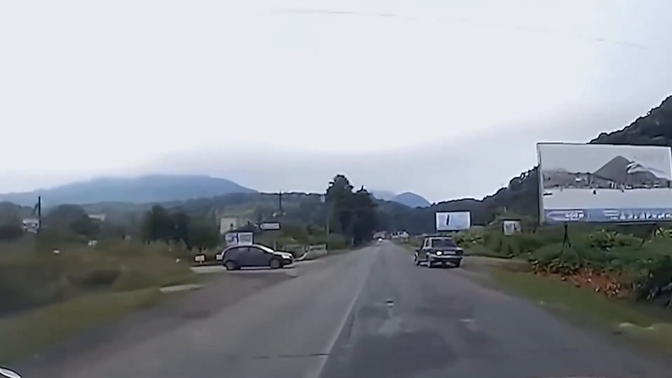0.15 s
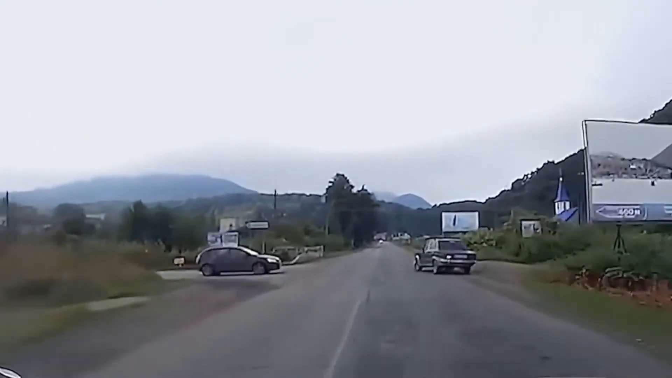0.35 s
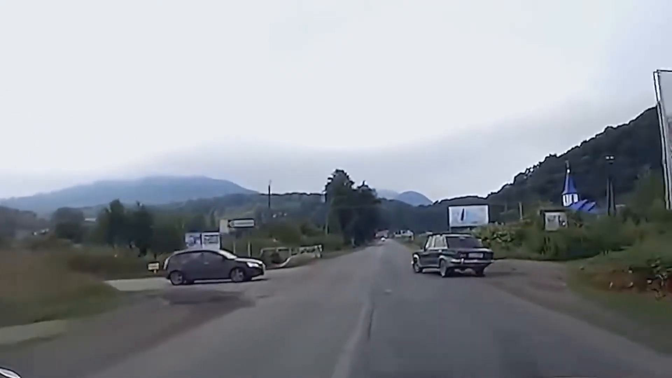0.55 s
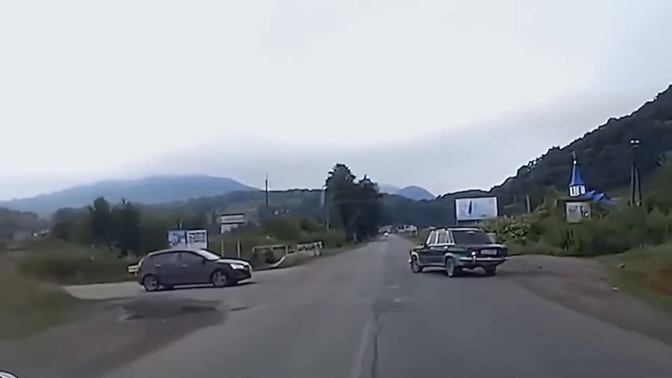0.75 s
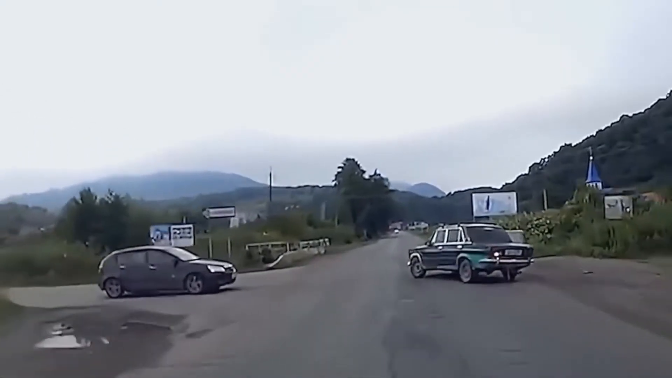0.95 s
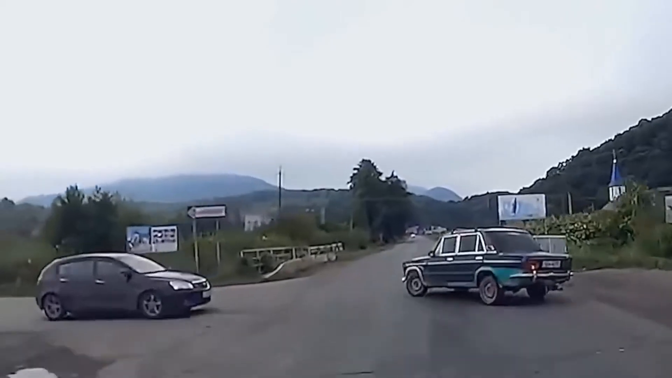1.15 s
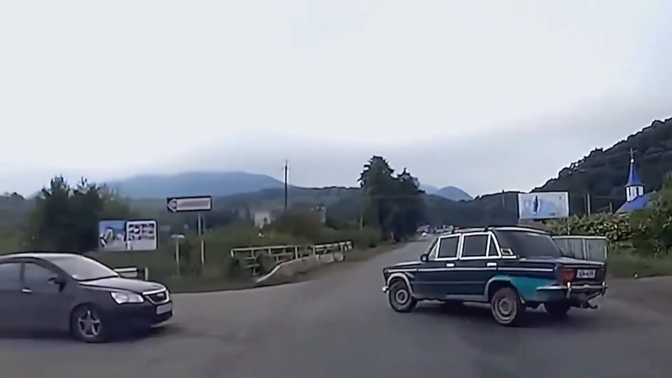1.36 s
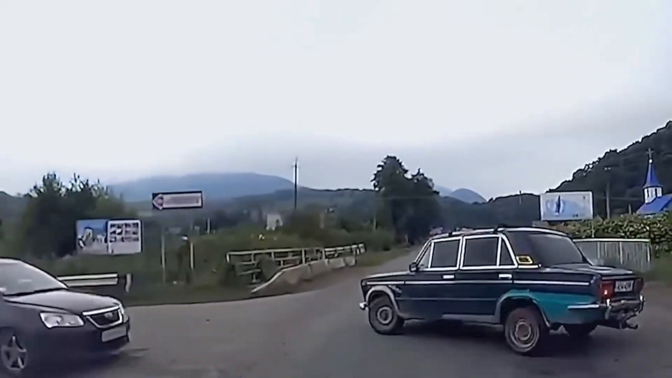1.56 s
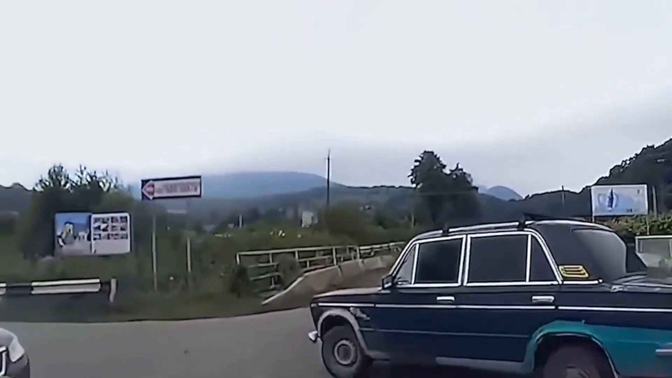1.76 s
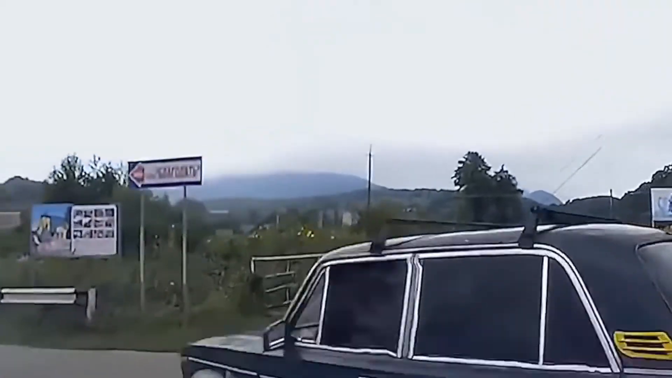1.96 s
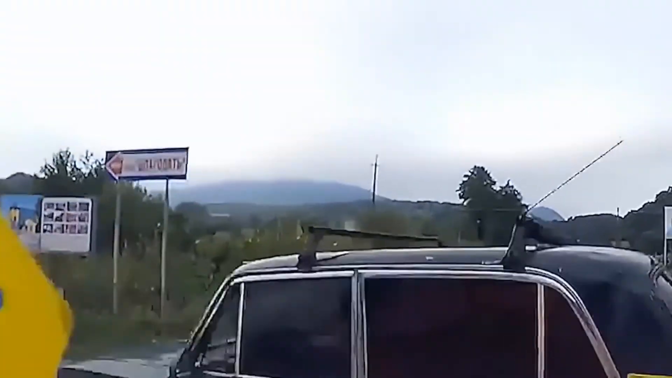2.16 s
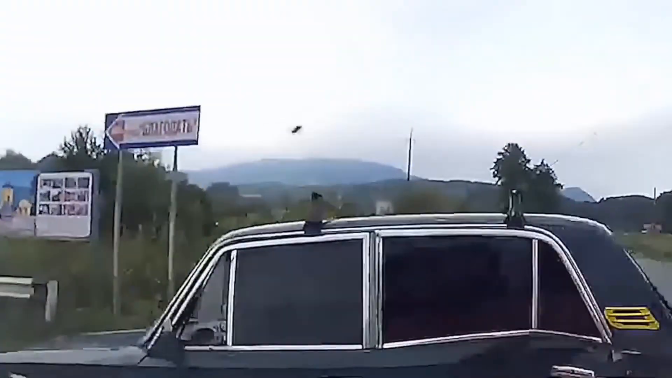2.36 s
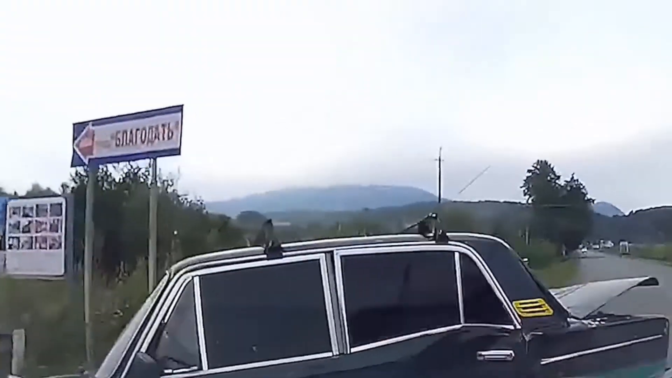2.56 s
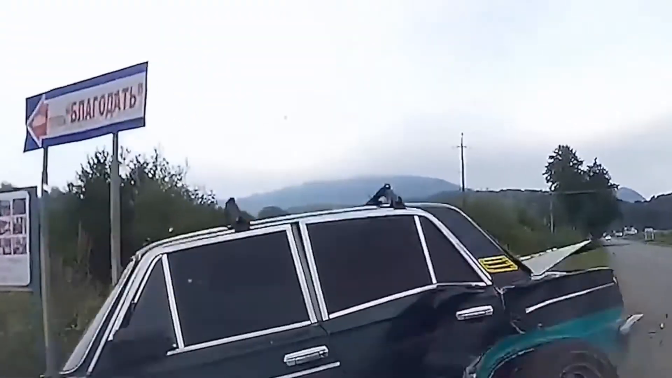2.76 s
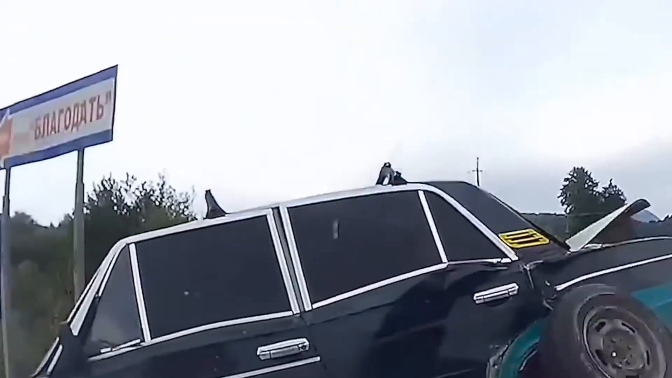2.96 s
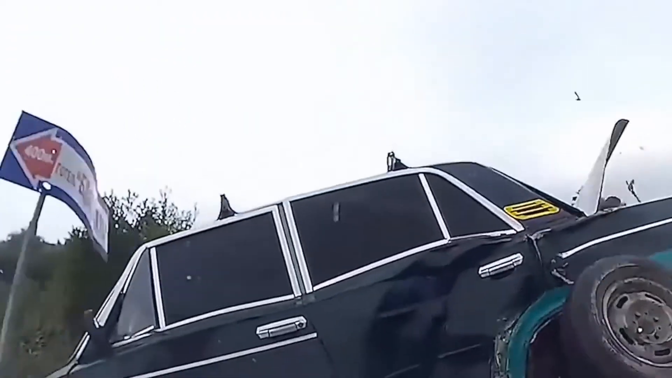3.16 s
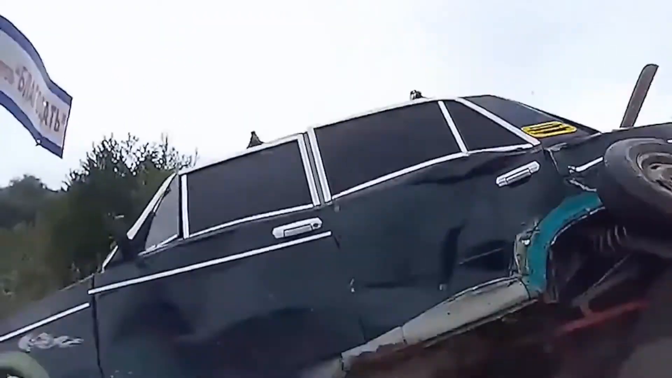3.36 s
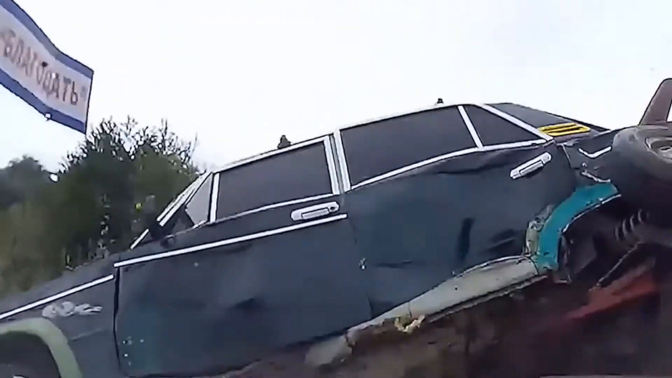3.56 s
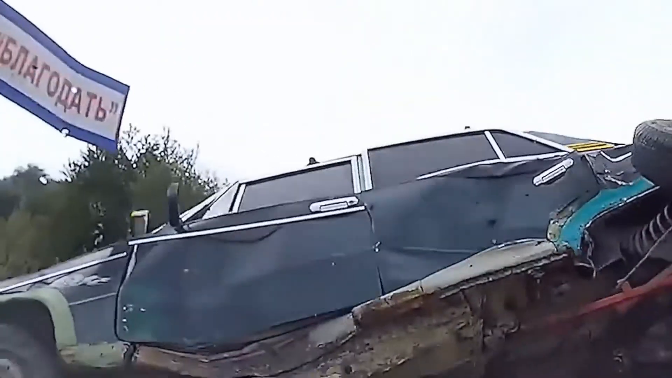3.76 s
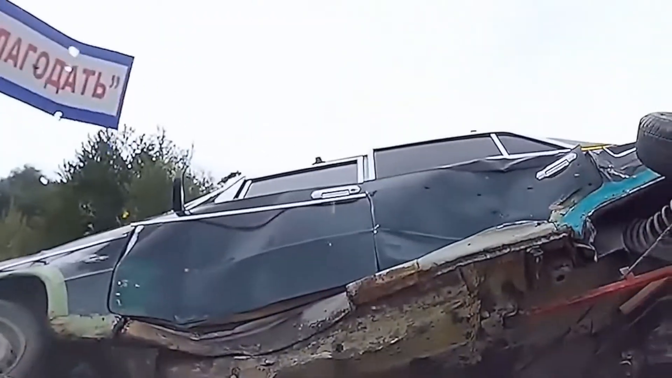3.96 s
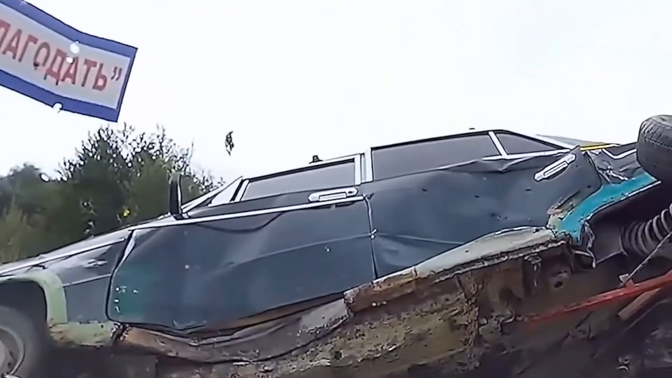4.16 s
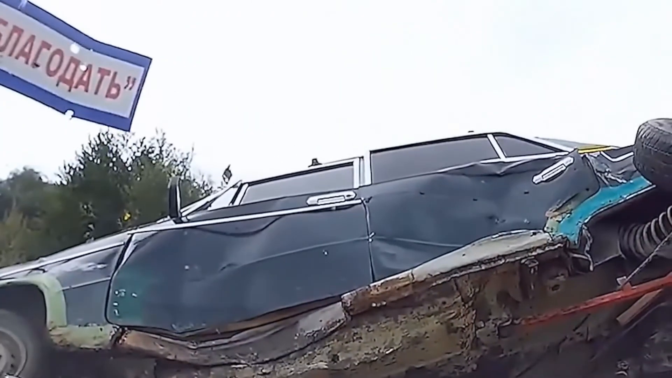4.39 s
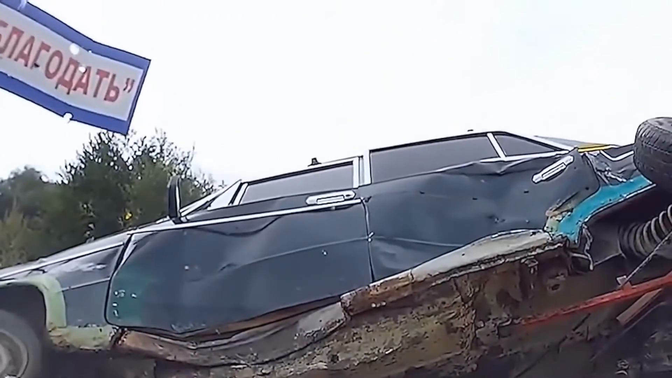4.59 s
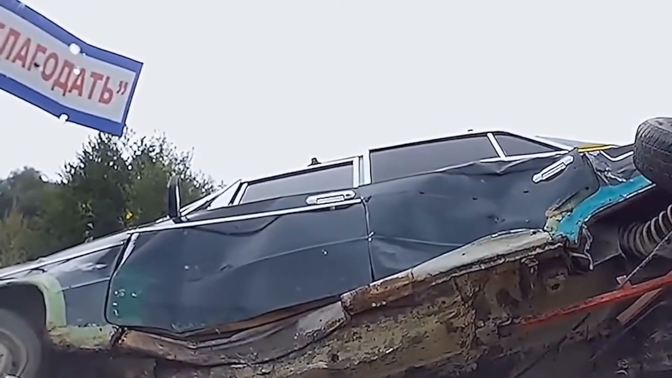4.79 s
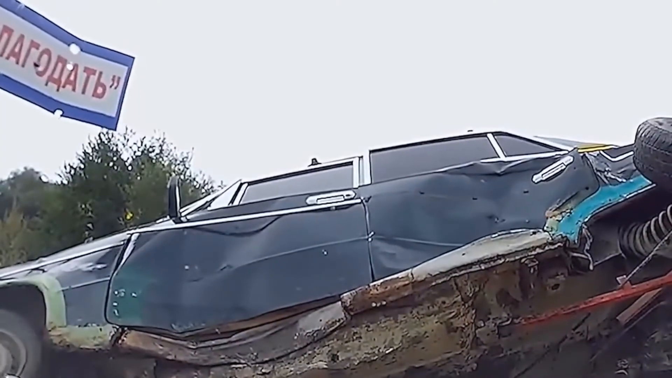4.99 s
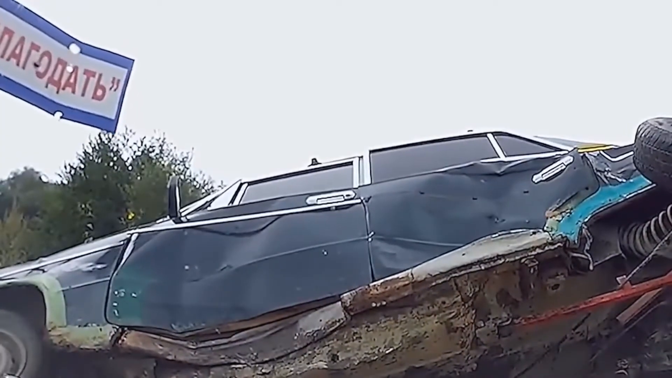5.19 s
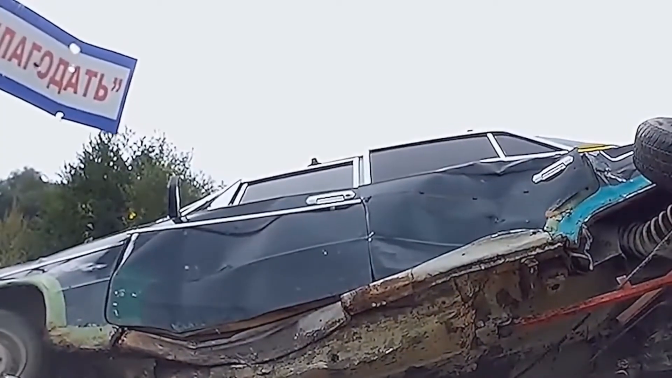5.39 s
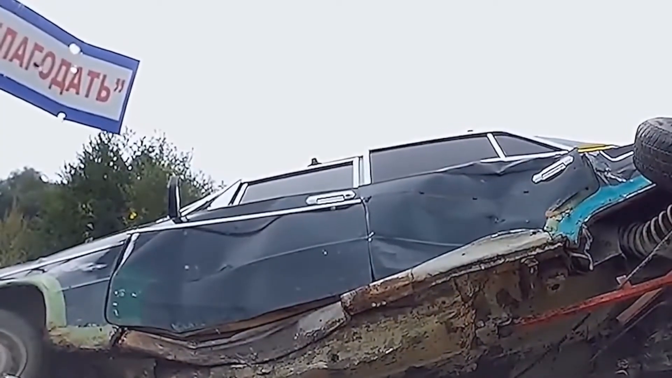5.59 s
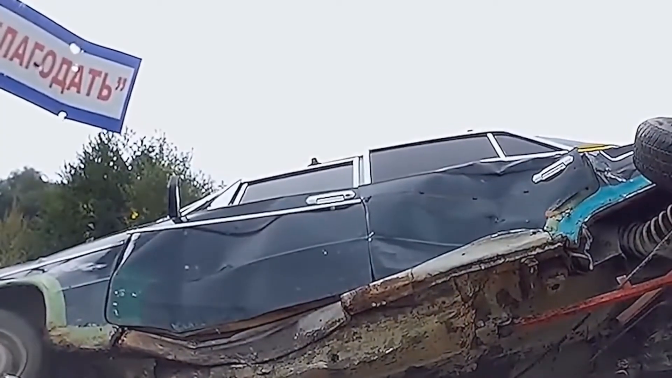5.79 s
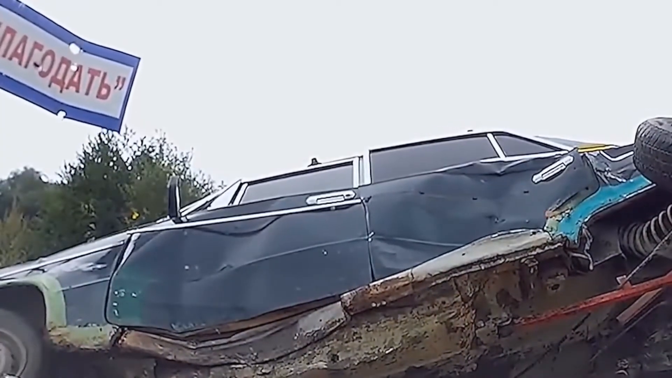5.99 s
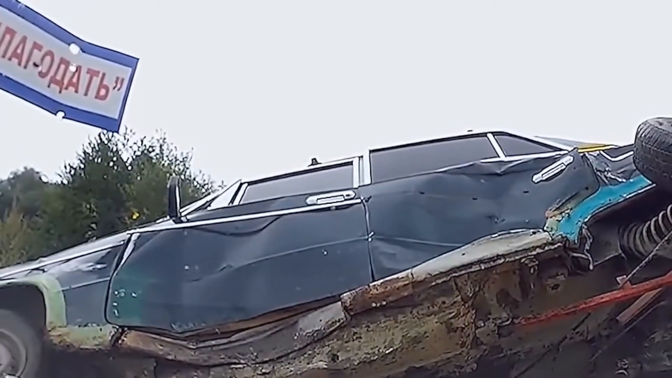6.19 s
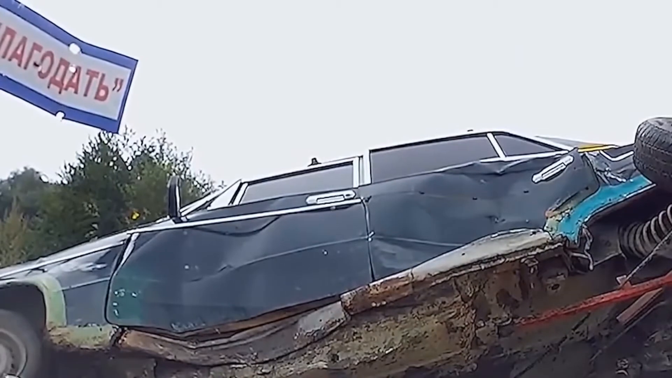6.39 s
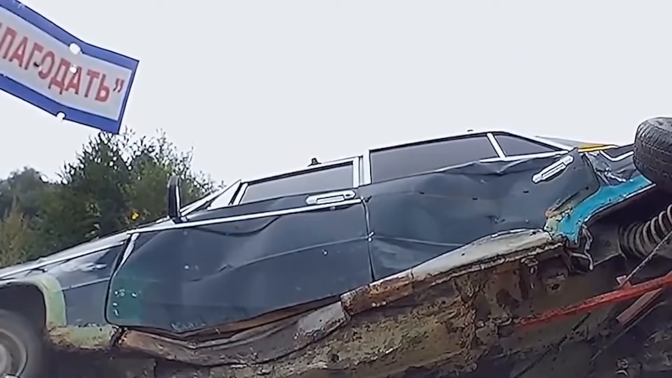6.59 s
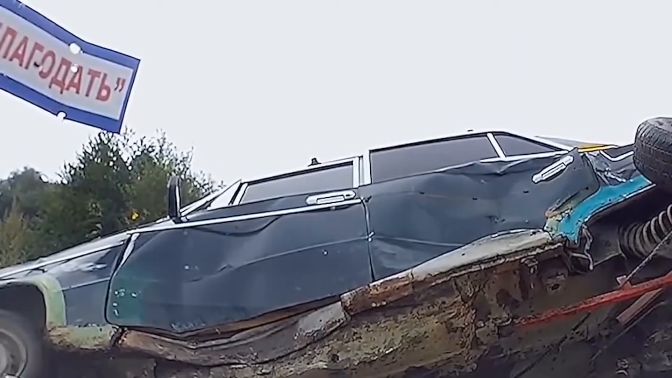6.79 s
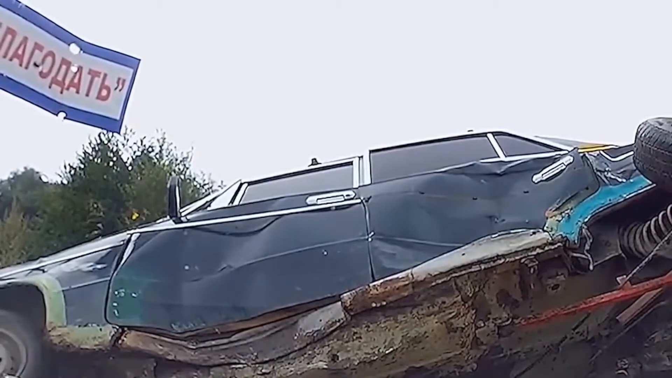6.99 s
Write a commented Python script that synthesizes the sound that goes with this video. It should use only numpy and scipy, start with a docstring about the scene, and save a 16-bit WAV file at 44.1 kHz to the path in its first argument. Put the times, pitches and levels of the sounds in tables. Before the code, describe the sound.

Inside a braking car, low booming heave, tyre roar and rattling trim build to a violent metallic crash, then a few knocks over a rough idle.

```python
"""Inside a car, microphone on the windscreen. The car brakes hard on a rough road: the body heaves as a wavering tone,
the floor pan booms in a few modes, tyres roar as lumpy noise, and trim rattles brighter and brighter.
At about 2.2 s it rams the side of another car and shoves it off the verge: decaying bursts of contacts ring sheet,
trim and body shell, and the small microphone flattens the biggest heaves.
By 4.7 s the car has stopped; a few knocks and a scrape follow over the engine idling, a firing tone with overtones."""
import sys
import numpy as np
from scipy import signal
from scipy.io import wavfile
from scipy.ndimage import uniform_filter1d

SR = 44100
rng = np.random.default_rng(int(sys.argv[2]) if len(sys.argv) > 2 else 0)


def put_to_file(sound):
    """Save the sound as 16-bit audio at rate SR, in the file named by the first command-line argument."""
    columns = np.atleast_2d(sound).T  # one column per channel
    safe = np.clip(columns, -1, 1)
    whole_steps = np.round(safe * 32767)
    wavfile.write(sys.argv[1], SR, whole_steps.astype(np.int16))


N = 310464
TIME = np.arange(N) / SR   # s

# Levels stand as they reach the microphone, before it overloads; heave and boom are muted once the car rests.
# The ride between surges: t/s, heave level/dB, floor pan boom level/dB, roar level/dB, rattle level/dB
RIDE = [(0, -29, -28, -31.5, -45.5), (0.5, -24, -24, -31.5, -44), (0.9, -21.5, -26, -31.5, -39.5),
        (1.35, -18, -21.5, -31, -43.5), (1.95, -18, -29.5, -33.5, -36), (2.2, -21.5, -21, -26, -31.5),
        (2.56, -22.5, -35, -50.5, -53.5), (2.85, -23.5, -26, -41.5, -47.5), (3.3, -31, -30.5, -49.5, -50),
        (3.72, -17.5, -29.5, -57, -54), (4.24, -28, -33, -38, -53), (4.65, -31, -42.5, -44, -49.5),
        (5.05, -31, -44, -43, -50.5), (7.04, -29, -44, -44, -53)]
# Surges of heave, boom, roar and rattle; the last, at rest, is a scrape: peak t/s, time to build 20 dB/s,
# time to sink 20 dB/s, heave level/dB, boom level/dB, roar level/dB, rattle level/dB;
# very short times are lengthened in shaking()
SURGES = [(1.07, 0.1, 0.5, -11, -20.5, -30, -42), (1.529, 0.13, -0.2, -15, -24, -25, -36),
          (1.67, 0.57, 0.8, -14, -16, -34, -52), (1.839, 0.15, 0.05, -11, -12.5, -34, -33.5),
          (2.202, 0, 0, -27, -13.5, -38, -52), (2.269, 0.16, 0.16, -15.5, -9, -22.5, -36),
          (2.46, 0.15, 0.23, -14.5, -28, -40, -46), (2.68, 0, 0, -13, -34, -49, -61),
          (2.97, 0.06, 0.26, -9.5, -17, -22.5, -37.5), (3.15, 0.4, 0.06, -9, -21, -39.5, -55),
          (3.26, 0.3, 0.5, -15.5, -31.5, -49.5, -58), (3.459, 0.09, 0.3, -22.5, -18.5, -28.5, -45),
          (3.579, -0.01, 0.03, 1, -27.5, -20.5, -34.5), (3.821, 0.06, 0.23, -23, -36, -30.5, -39.5),
          (4.1, 0.07, 0.17, -22.5, -23, -40, -51.5), (4.388, 0.37, 0.5, -38, -32, -31.5, -38),
          (5.6, 0.4, -0.18, -39, -52, -40.5, -47)]
# Swing of the body on its springs: t/s, f/Hz
HEAVE_PITCH = [(0, 40), (1.5, 34.22), (1.87, 37.61), (2.5, 30.98), (3.0, 40.31), (3.2, 27.05),
               (3.58, 38.03), (4.7, 32.16)]
# Floor pan modes: f/Hz, level/dB, width of the narrower of two resonances/Hz
PAN_MODES = [(60.7, 0, 27), (94.1, -2, 14.2), (127, -7.5, 70.4)]
# Spectrum of the tyre and sheet roar: f/Hz, level per Hz/dB
ROAR_SPECTRUM = [(65, -30), (110, -1.5), (136, -10), (188, -6.5), (323, -14.5), (367, -8.5), (785, -19),
                 (1800, -40.5), (2340, -65)]
# Spectrum of the trim rattle: f/Hz, level per Hz/dB
RATTLE_SPECTRUM = [(590, -26), (1000, -6), (2000, -6), (3820, -9), (5710, -11.5), (6750, -7), (7600, -14.5)]
# Braking brightens the rattle: t/s, level an octave above 3 kHz/dB
RATTLE_TILT = [(0, -2.5), (.8, 0), (1.9, 7.5), (2.5, 0), (4.3, -1), (7.04, -1)]
# Crunches of sheet and trim: t/s, peak level of the bright part/dB, centre f/Hz, t60 of the contacts/s,
# dull part level re bright peak/dB, dull part f/Hz
CRUNCHES = [(0.61, -27.5, 2600, 0.15, -5, 1700), (1.008, -26.5, 2380, 0.1, -1.5, 1500),
            (2.061, -9.5, 3000, 0.11, 0.5, 940), (2.2193, -9.5, 3060, 0.075, 3, 1110),
            (2.2454, -11.5, 2960, 0.16, 2, 574), (2.344, -15, 5000, 0.13, -6, 670),
            (2.8677, -23.5, 2600, 0.17, -6.5, 1400), (3.0002, -23.5, 1870, 0.056, 2, 764.6),
            (3.54, -25.5, 2500, 0.19, 5.5, 700), (4.364, -22.5, 2510, 0.1, 2.5, 890),
            (4.3779, -20.5, 2800, 0.11, -3, 1300), (4.391, -19, 2600, 0.05, 5, 1120),
            (4.496, -27.5, 5270, 0.043, -16, 630), (4.8993, -30, 2780, 0.042, 7.5, 780),
            (4.991, -28.5, 3430, 0.14, -3, 1400), (5.3098, -29, 2860, 0.28, -7, 665),
            (5.341, -22.5, 3400, 0.18, -11, 646)]
# Short sharp ticks of loose things: t/s, peak level/dB, centre f/Hz
TICKS = [(0.801, -13.5, 1590), (0.8165, -21.5, 3900), (0.918, -14, 6430), (0.931, -12.5, 5200),
         (1.1013, -5.5, 4600), (1.1565, -10.5, 6640), (1.487, -14.5, 4300), (1.54, -15, 2900),
         (1.851, -8, 2400), (2.2192, 10, 3180), (2.261, -1.5, 5700), (2.393, -18, 3630),
         (2.5336, -19, 6000), (3.5556, -6, 5630), (3.578, -13, 3500), (4.3666, -15.5, 1500),
         (5.565, -26, 3400), (6.355, -32, 1800), (6.701, -31, 1000)]
# Modes of trim and panels: f/Hz
TRIM_MODES = [210, 300, 480, 650, 720, 870, 970, 1120, 1280, 1510, 1750, 2200, 2570, 2930, 3170, 3700, 4400,
              5600]
# Soft thumps in the body shell: t/s, peak level/dB, t60 of the blow/s
THUMPS = [(0.699, -13, 0.13), (1.525, -9.5, 0.36), (2.062, -15, 0.17), (2.236, 7.5, 0.15),
          (2.451, -18.5, 0.12), (2.94, -8.5, 0.76), (3.421, -15.5, 0.2), (3.55, -2.5, 0.18),
          (3.882, -20, 0.24), (4.38, -16, 0.1), (5.622, -25, 0.19), (6.358, -24.5, 0.11),
          (6.704, -26.5, 0.086)]
# Body shell modes: f/Hz, level/dB, width of the narrower of two resonances/Hz
SHELL_MODES = [(98.6, 6, 36), (158, 5, 54.5), (207.4, 0, 56), (282, -0.5, 107), (421, -10, 120)]
# Hollow knocks where one panel rings alone: t/s, peak level/dB, pitch f/Hz
RAPS = [(0.625, -35, 1750), (0.916, -28.5, 1280), (2.275, -19, 854), (2.872, -17, 298), (2.990, -16, 720),
        (3.424, -24, 480), (3.755, -18, 219), (3.836, -27.5, 644), (4.408, -26, 1260), (5.0547, -28.5, 875),
        (5.624, -33, 650)]
# Idling engine: t/s, firing f/Hz, firing tone level/dB, overtones level re firing tone/dB
IDLE = [(4.55, 36, -32.5, -8), (4.9, 25.5, -29, -15.5), (5.4, 25, -29.5, -13.5), (5.7, 24, -34, -9),
        (7.04, 24.2, -31.5, -11)]
# Overtones of the firing tone: multiple of the firing rate, level about which it wavers/dB
IDLE_OVERTONES = [(2, 0), (3, -14), (5, -16)]
# Moments when the treble drops out: from t/s, to t/s
TREBLE_GAPS = [(2.034, 2.234), (3.385, 3.44), (4.373, 4.413), (4.885, 4.924)]

STOP_S = 4.7       # the car is at rest from here
ROUND_S = 0.012    # the top of a surge is rounded
RAP_T60_S = 0.031  # the contact of a rap is short
OVERLOAD, KNEE = 0.68, 8.0   # amplitude of the flat tops, sharpness of their corners
TREBLE_RIDES, TREBLE_TOP = 0.6, 0.33   # share of the treble that rides on the flat tops, and its limit
COUPLING_HZ, GAP_STOP_HZ, CUTOFF_HZ = 6, 4515, 8400   # low cut, top of a treble gap, top of the sound


def body(heave_gain, boom_gain):
    """The heave is a wavering swing with road jolts; the floor pan is shaken noise in a few modes."""
    swing_hz = in_time(HEAVE_PITCH)[0] * (1 + 0.0993 * drift(12.07))
    phase = 2 * np.pi * np.cumsum(swing_hz) / SR
    road = evened(resonate_twice(rng.standard_normal(N), 33, 40, 40), share=0.56)
    swing = np.sin(phase) * from_db(2.6 * drift(20))
    heave = evened(swing + 0.25 * road, share=0.12)
    push = rng.standard_normal(N)
    pan = 0
    for hz, db, width in PAN_MODES:
        # a wide mode takes more power from the noise: the root evens that out
        pan = pan + from_db(db) * resonate_twice(push, hz, width, 2 * width) / np.sqrt(width)
    return moving() * (heave_gain * heave + boom_gain * evened(pan, share=0.82))


def shake(roar_gain, rattle_gain):
    """Roar is lumpy noise; rattle is noise plus dense uneven contacts of trim and grit; both steadier at rest."""
    tilt_db, = in_time(RATTLE_TILT)
    unrest = 0.26 + 0.44 * moving()
    roar = coloured(rng.standard_normal((2, N)), ROAR_SPECTRUM, 100, 2000, 0,
                    patchy_db=2.0 * unrest, rate_hz=16)
    sizes = from_db(10.0 * np.minimum(rng.exponential(1, (2, N)), 5)) * rng.choice([-1, 1], (2, N))
    grit = rms_one(sizes * (rng.random((2, N)) < 1500 / SR))   # about 1500 contacts a second
    contacts = rng.standard_normal((2, N)) + 0.52 * unrest * grit
    rattle = coloured(contacts, RATTLE_SPECTRUM, 904, 7740, tilt_db,
                      patchy_db=2.06 * unrest, rate_hz=12.0)
    return roar_gain * roar + rattle_gain * rattle


def shaking():
    """Gains of heave, boom, roar and rattle: the ride plus every surge, added as power."""
    power = from_db(in_time(RIDE)) ** 2
    for s, build_s, sink_s, *db in SURGES:
        # a mass this size cannot jump at once
        build_s, sink_s = np.clip([build_s, sink_s], 2 * ROUND_S, s / 3)
        near = slice(round((s - 3 * build_s) * SR), round((s + 3 * sink_s) * SR))   # down to about -60 dB
        away = np.hypot(TIME[near] - s, ROUND_S) - ROUND_S
        loss_db = 20 * away / np.where(TIME[near] < s, build_s, sink_s)
        power[:, near] += from_db(np.array(db)[:, None] - loss_db) ** 2
    return np.sqrt(power)


def moving():
    """1 while the car moves, 0 once it rests."""
    return np.clip((STOP_S - TIME) / 0.21, 0, 1)


def knocks():
    """Each crunch is a bright crack and a hollow clatter in the panels; each tick a crack of a few milliseconds."""
    out = np.zeros(N + SR)
    for s, db, hz, t60, dull_db, dull_hz in CRUNCHES:
        contacts = burst(t60, rise_s=0.0038, uneven_db=2.0)
        sharp = crack(contacts, hz, width=1.0, broad=0.84, edge_hz=2000)
        bright = peak_one(sharp + 0.46 * panel(contacts, hz, fall_db=12.0))
        dull_contacts = burst(0.68 * t60, rise_s=0.0015, uneven_db=2.0)
        hollow = panel(dull_contacts, dull_hz, fall_db=14)
        place(out, s, db, bright + from_db(dull_db) * hollow)
    for s, db, hz in TICKS:
        contact = burst(0.007, rise_s=0.0001)
        place(out, s, db, crack(contact, hz, width=0.6, broad=3.0, edge_hz=1000))
    return out[:N]


def thumps():
    """A soft blow sets the shell modes going, low ones most."""
    out = np.zeros(N + SR)
    for s, db, t60 in THUMPS:
        blow = butter(burst(t60, rise_s=0.0013), 2, 600, "low")
        ring = 0
        for hz, level, width in SHELL_MODES:
            ring = ring + from_db(level) * peak_one(resonate_twice(blow, hz, width, 3.0 * width))
        place(out, s, db, peak_one(ring))
    return out[:N]


def raps():
    """A short blunt contact sets the modes nearest its pitch ringing."""
    out = np.zeros(N + SR)
    for s, db, hz in RAPS:
        place(out, s, db, panel(burst(RAP_T60_S, rise_s=0.00079), hz, fall_db=23.5))
    return out[:N]


def idle():
    """Firing tone and its overtones, fading in as the car comes to a stand, its rate settling lower."""
    firing_hz, db, overtone_db = in_time(IDLE)
    phase = 2 * np.pi * np.cumsum(firing_hz * (1 + 0.012 * drift(5.0))) / SR
    overtones = 0
    for multiple, level in IDLE_OVERTONES:
        overtones = overtones + from_db(level + 3.3 * drift(11.5)) * np.cos(multiple * phase)
    tone = np.cos(phase) + from_db(overtone_db) * overtones
    return (1 - moving()) * from_db(db) * np.sqrt(2) * tone   # root 2: the level is rms


def burst(t60, rise_s, uneven_db=0, length=13000):
    """A bunch of contacts of uneven size that swells quickly and dies away."""
    t = np.arange(length) / SR
    clumps = np.repeat(rng.standard_normal(length // 65), 65)   # one contact lasts about 1.5 ms
    swell = 1 - np.exp(-t / rise_s)
    return rng.standard_normal(length) * swell * from_db(uneven_db * clumps - 60 * t / t60)


def crack(contacts, hz, width, broad, edge_hz):
    """Contacts ring round one centre (width as a share of it), with a broad bright edge."""
    edge = butter(contacts, 2, edge_hz, "high")
    return peak_one(peak_one(resonate(contacts, hz, width * hz)) + broad * peak_one(edge))


def panel(contacts, hz, fall_db):
    """Modes near the struck part's own pitch ring most; every blow finds them with other strengths."""
    octaves_away = np.abs(np.log2(np.array(TRIM_MODES) / hz))
    levels = -fall_db * octaves_away + 1.8 * rng.standard_normal(len(TRIM_MODES))
    ring = 0
    for f, db in zip(TRIM_MODES, levels):
        ring = ring + from_db(db) * peak_one(resonate_twice(contacts, f, 0.066 * f, 0.85 * f))
    return peak_one(ring)


def coloured(x, spectrum, low_hz, high_hz, tilt_db, patchy_db, rate_hz):
    """Narrow bands, each with its level and flicker; the tilt acts above 3 kHz; rms about 1."""
    hz, db = np.transpose(spectrum)
    edges = np.geomspace(low_hz, high_hz, num=12)
    together = drift(rate_hz)   # flicker shared by all bands
    out = 0
    for k, (low, high) in enumerate(zip(edges, edges[1:])):
        band = butter(x[k % 2], 2, [low, high], "band")   # neighbours take separate noises
        centre = np.sqrt(low * high)
        level = np.interp(np.log(centre), np.log(hz), db) + tilt_db * max(0, np.log2(centre / 3000))
        out = out + band * from_db(level + patchy_db * (together + 1.3 * drift(rate_hz)))
    return out / np.sqrt(np.mean((out / from_db(tilt_db / 2)) ** 2))


def resonate(x, hz, width_hz):
    """One resonance, gain 1 on top."""
    r = np.exp(-np.pi * width_hz / SR)
    feedback = [1, -2 * r * np.cos(2 * np.pi * hz / SR), r * r]
    return signal.lfilter(np.array([1, 0, -1]) * (1 - r * r) / 2, feedback, x)


def resonate_twice(x, hz, width_hz, second_width_hz):
    """Two resonances in a row on one pitch, for steeper skirts."""
    return resonate(resonate(x, hz, width_hz), hz, second_width_hz)


def butter(x, order, hz, kind):
    """Butterworth filter."""
    return signal.sosfilt(signal.butter(order, hz, kind, fs=SR, output="sos"), x)


def drift(rate_hz):
    """Slow chance, spread 1, drawn every 40 samples and joined by lines."""
    r = np.exp(-2 * np.pi * rate_hz * 40 / SR)
    slow = signal.lfilter([1], [1, -2 * r, r * r], rng.standard_normal(N // 40 + 2002))[2000:]
    return np.interp(np.arange(N) / 40, np.arange(len(slow)), rms_one(slow))


def evened(x, share):
    """Chance swells partly flattened; rms 1."""
    return rms_one(x / uniform_filter1d(x ** 2, size=3000) ** share)


def in_time(rows):
    """Columns of a curve table, one value a sample."""
    s, *columns = np.transpose(rows)
    return [np.interp(TIME, s, c) for c in columns]


def place(out, s, db, sound):
    """Add a sound at its time and level."""
    out[round(s * SR):][:len(sound)] += from_db(db) * sound


def from_db(db):
    """Decibels to gain."""
    return 10 ** (np.asarray(db) / 20)


def rms_one(x):
    """Scale to rms 1."""
    return x / np.sqrt(np.mean(x ** 2) + 1e-20)


def peak_one(x):
    """Scale to peak 1."""
    return x / np.max(np.abs(x))


def scene():
    """Everything reaches one microphone, with no further loss for distance."""
    heave, boom, roar, rattle = shaking()
    car = body(heave, boom) + shake(roar, rattle)
    blows = knocks() + raps() + thumps()
    return (car + blows + idle())[None]


def record(dry):
    """Flat tops on overload with some treble riding on them, short treble drop-outs, then the top is cut."""
    treble = TREBLE_RIDES * butter(dry, 2, 1000, "high")
    rest = dry - treble
    flattened = rest / (1 + np.abs(rest / OVERLOAD) ** KNEE) ** (1 / KNEE)
    x = flattened + TREBLE_TOP * np.tanh(treble / TREBLE_TOP)
    x = butter(x, 1, COUPLING_HZ, "high")   # flat tops sag
    dull = signal.sosfiltfilt(signal.cheby2(10, 40, GAP_STOP_HZ, fs=SR, output="sos"), x)
    gap = sum(1.0 * (TIME > start) * (TIME < end) for start, end in TREBLE_GAPS)
    gap = uniform_filter1d(gap, size=260)   # soft edges of about 6 ms
    x = x + gap * (dull - x)
    x = signal.sosfilt(signal.cheby1(8, 0.5, 7350, fs=SR, output="sos"), x)
    return signal.sosfilt(signal.cheby2(12, 70, CUTOFF_HZ, fs=SR, output="sos"), x)


dry = scene()
out = record(dry)
put_to_file(out)
```